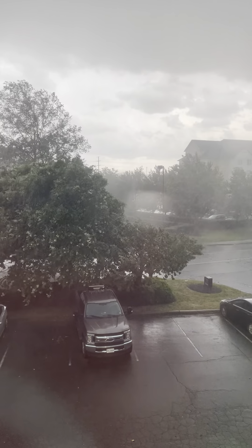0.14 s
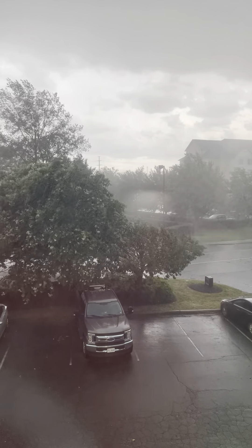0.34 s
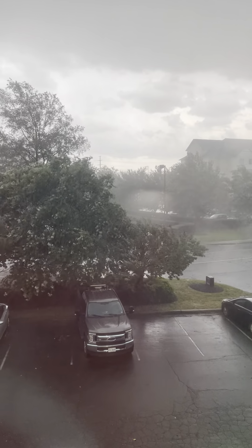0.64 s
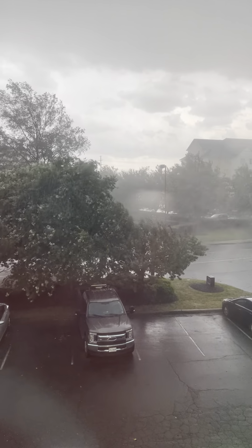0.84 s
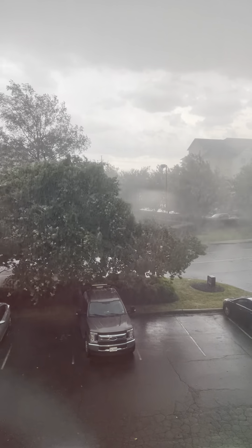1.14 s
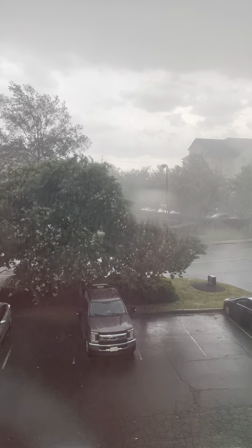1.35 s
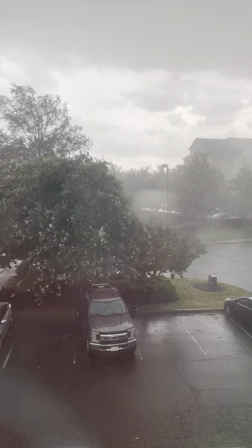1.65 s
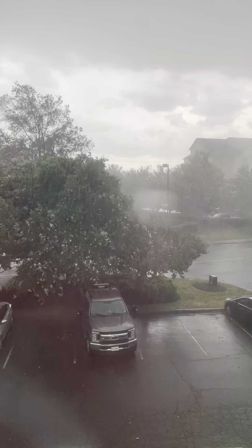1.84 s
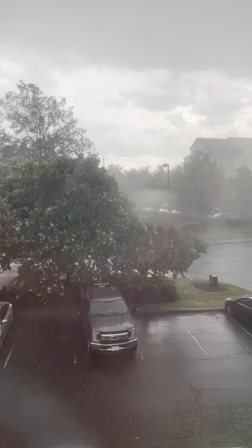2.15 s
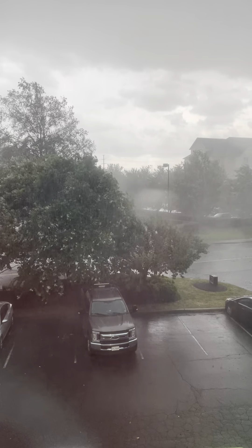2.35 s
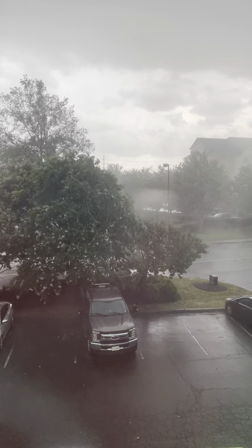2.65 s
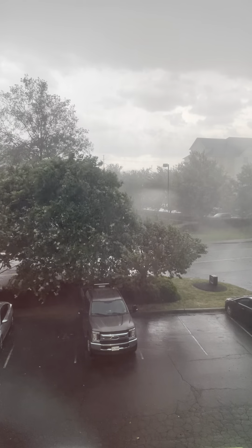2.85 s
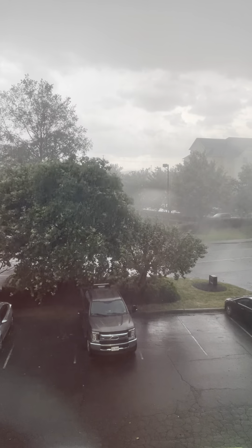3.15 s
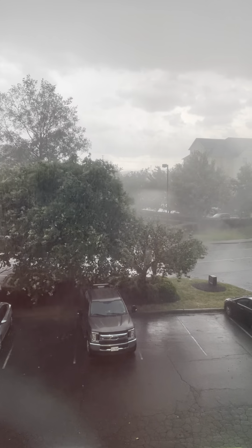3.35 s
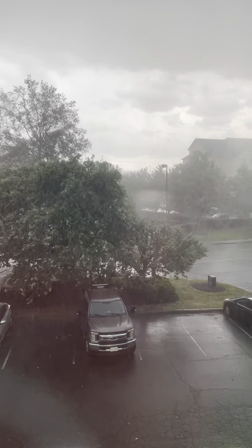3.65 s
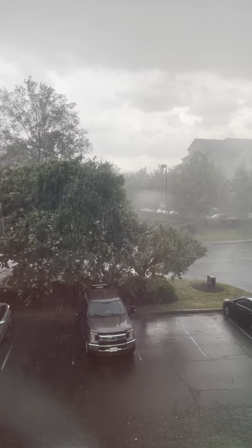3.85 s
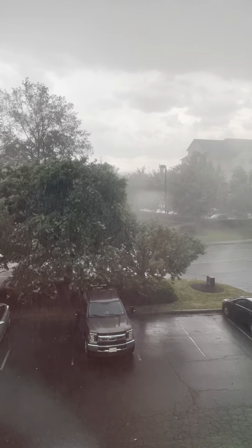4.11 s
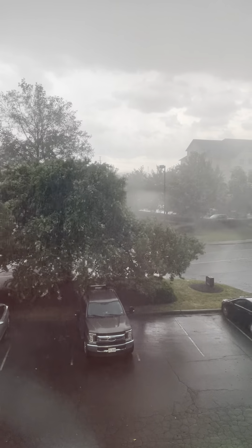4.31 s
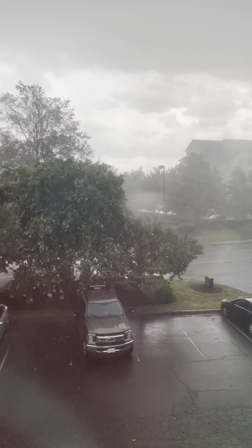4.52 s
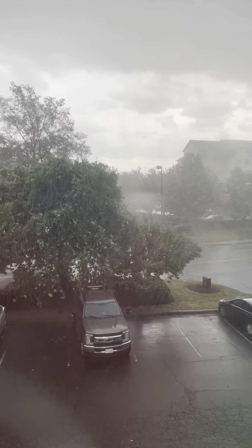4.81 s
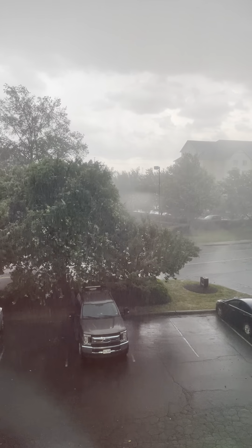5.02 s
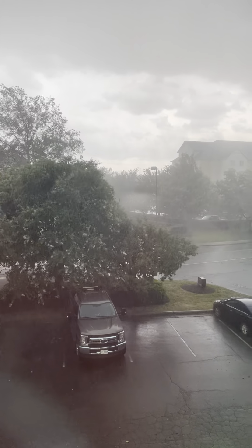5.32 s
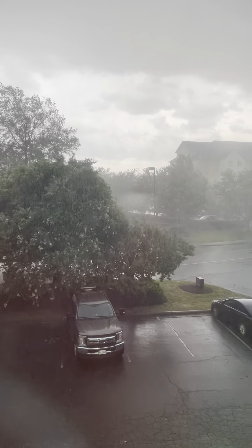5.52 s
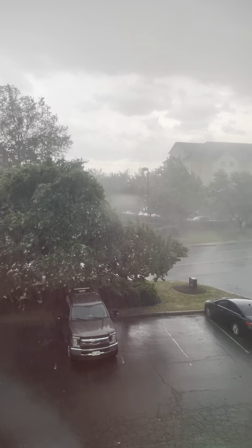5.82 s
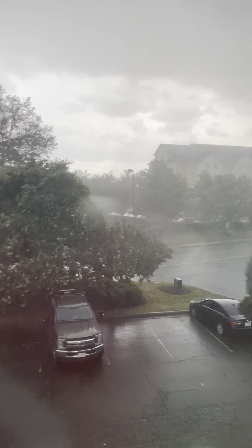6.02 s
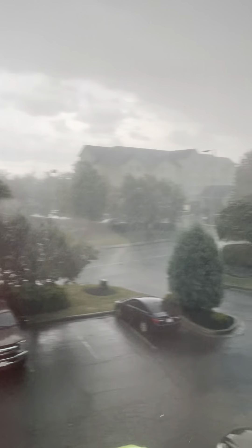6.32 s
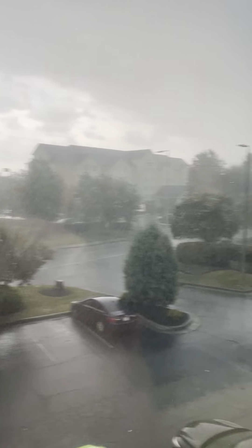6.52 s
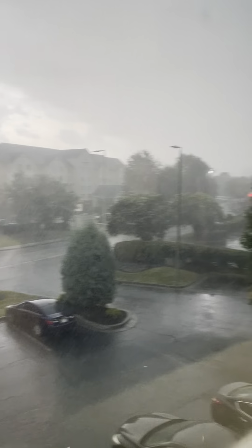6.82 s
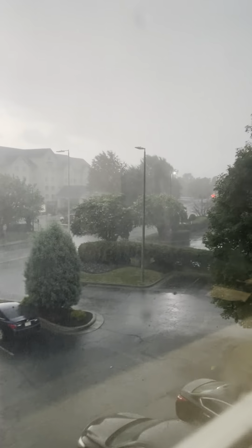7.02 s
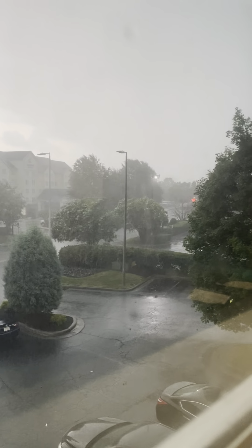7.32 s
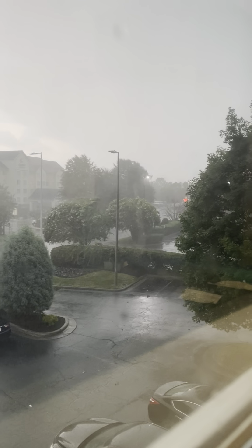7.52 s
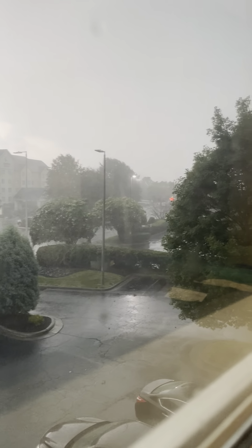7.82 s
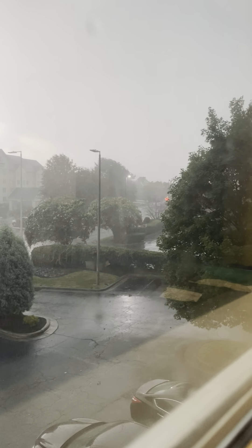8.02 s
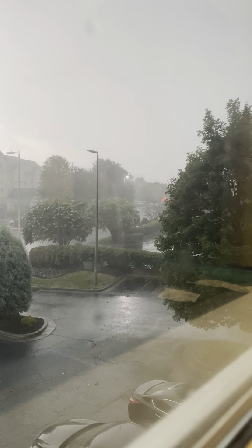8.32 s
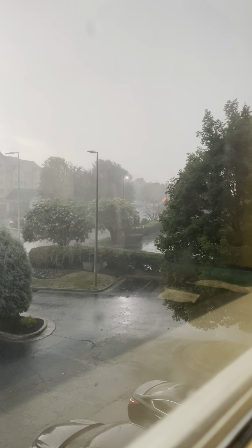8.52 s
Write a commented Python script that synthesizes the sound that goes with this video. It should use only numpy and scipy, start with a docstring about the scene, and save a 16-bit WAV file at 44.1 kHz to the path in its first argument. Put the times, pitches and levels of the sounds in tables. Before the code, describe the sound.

Heard indoors at a closed window, a heavy rainstorm is a dark, dense wash around 500 to 1500 hertz, with a much softer pattering hiss above and a low wind rush below. No thunder stands out. An air conditioner runs throughout: a deep, slightly throbbing compressor hum near 58 and 175 hertz, with faint higher lines and blower boom. At 0 to 1 second the gust is a little stronger, with soft finger rubbing and a sharp click at 0.27. From about 1.5 to 5.8 the sound is steady and nearly unhandled. From 6.0 to 7.5 the handheld microphone turns: dry scrapes at 6.1 and 6.3, rough ticks near 6.2, 6.8, 7.1 and 7.4, while the rain swells unevenly, hollow and phasey, with wide opposing channels. It settles into a steady wash and hum until 8.7.

```python
"""Rainstorm behind a closed window

Rain is coloured noise with random impacts, combed by early echoes: a muffled wash and a pattering hiss.
Wind is a low noise rush; an air conditioner adds fan boom (noise in room modes) and compressor hum (cosines).
A hand-held phone ticks and rubs in the grip (bursts through case modes) and turns at about six seconds;
on the way it crosses standing waves before the glass, where its two microphones hear opposite pressures."""
import sys
import numpy as np
from scipy import signal
from scipy.fft import rfft, irfft, next_fast_len
from scipy.io import wavfile

SR = 44100
rng = np.random.default_rng(int(sys.argv[2]) if len(sys.argv) > 2 else 0)


def waveform_to_disk(signal):
    """Save audio, clipped to [-1, 1], as 16-bit WAV at the path in sys.argv[1]."""
    frames = np.transpose(np.atleast_2d(signal))
    scaled = np.clip(frames, -1, 1) * 32767
    samples = np.round(scaled).astype(np.int16)
    wavfile.write(sys.argv[1], SR, samples)


N = 381906
T = np.arange(N) / SR
SIZE = next_fast_len(N, True)
FREQ = np.maximum(np.fft.rfftfreq(SIZE, 1 / SR), 1)

# moving air: (time [s], gust [dB], room boom [dB])
GUSTS = [(.2, 3.5, -1.5), (.8, 3.5, 2), (1.5, -0.5, -1.5), (4.1, 0.5, -5), (5.7, 0.5, -3), (6.8, 0, -1.6),
         (8.66, -0.5, -0.5)]
# phone swinging along the pane: (time [s], wash gain [dB], low rush gain [dB])
SWING = [(5.6, 0.5, 0), (6.02, 0.5, -0.5), (6.11, -0.5, 1.5), (6.19, 0.5, 4), (6.25, 2, 5), (6.325, -1, 1),
         (6.39, 4, 2.5), (6.55, 2.5, 1.5), (6.64, 1, -3), (6.77, 3.5, 1), (6.83, -1, 1.5), (6.9, 2, -1),
         (7.02, 0, -1), (7.08, -1, -0.5), (7.3, 1, 2), (7.55, 1, 1), (7.8, 0.5, 1)]


def undb(db):
    """Decibels to amplitude gain."""
    return np.exp(np.asarray(db) * (np.log(10) / 20))


def curves(table):
    """Columns of a table, joined by straight lines in time."""
    time_s, *columns = np.transpose(table)
    return [np.interp(T, time_s, column) for column in columns]


def colour(points):
    """Gain at each frequency for (Hz, dB) points, closed beyond the ends."""
    hz, db = np.transpose(points)
    return undb(np.interp(np.log(FREQ), np.log(hz), db, left=-200, right=-200))


def resonance(hz, width_hz, freq=FREQ):
    """Response of one damped mode."""
    return 1 / (1 + 1j * (freq / hz - hz / freq) * hz / width_hz)


def shape(x, response):
    """Filter by a frequency response."""
    return irfft(rfft(x, SIZE) * response, SIZE)[..., :N]


def unit(x):
    """Scale to rms 1."""
    return x / np.sqrt(np.mean(x ** 2))


def noise():
    """Two unrelated white noises."""
    return rng.standard_normal((2, N))


def walk(rate_hz):
    """Smooth random curve with spread near 1, a new knot rate_hz times a second."""
    knots, coarse_s = rng.standard_normal(1024), T[::64]
    step, part = np.divmod(coarse_s * rate_hz, 1)
    k = step.astype(int) % (len(knots) - 1)
    rise = np.sin(np.pi / 2 * part) ** 2
    return np.interp(T, coarse_s, knots[k] + (knots[k + 1] - knots[k]) * rise)


def ears(pair, likeness, pan_db):
    """Mix two unrelated sounds to left and right with given correlation and left-minus-right balance."""
    c = np.clip(likeness, -1, 1)
    mid = pair[0] * np.sqrt((1 + c) / 2)
    side = pair[1] * np.sqrt((1 - c) / 2)
    lean = undb(pan_db)
    return np.array([lean * (mid + side), mid - side]) * np.sqrt(2 / (1 + lean ** 2))


def drops(per_s, spread_db):
    """Random impacts of very unequal size, independent in two channels."""
    hit = rng.random((2, N)) < per_s / SR
    size = undb(spread_db * np.minimum(rng.exponential(size=(2, N)), 5))
    return unit(hit * size * rng.standard_normal((2, N)))


def sheets(x, points, flicker_db, rate_hz, count=5):
    """Colour a white sound and let overlapping bands swell independently."""
    edges = np.log([points[0][0], points[-1][0]])
    place = np.interp(np.log(FREQ), edges, [0, count - 1])
    spectrum = rfft(x, SIZE) * colour(points) * np.sqrt(SR / 2)  # unit white noise becomes 0 dB per Hz
    out = 0
    for k in range(count):
        band = irfft(spectrum * np.maximum(1 - abs(place - k), 0), SIZE)[..., :N]
        out = out + band * undb(flicker_db * walk(rate_hz))
    return out


def pose():
    """How far the phone has turned, and how far its microphones straddle a node, both 0-1."""
    # turn along the window: (time [s], share [0-1])
    turning = [(5.7, 0.02), (6.2, 0.4), (6.8, 1), (7.5, 1)]
    # straddling a node of the sound before the glass: (time [s], share [0-1])
    straddling = [(.3, 0.08), (5.4, 0.21), (5.9, 0.5), (6.2, 1), (6.4, 0.94), (6.6, .74), (6.78, .9),
                  (7.0, .48), (7.3, 1), (7.65, .5), (8, .27), (8.66, .33)]
    return np.clip(curves(turning)[0], 0, 1), np.clip(curves(straddling)[0], 0, 1)


def alike():
    """Left-right correlation of the storm: negative astride a node, where pressures oppose."""
    open_likeness, node_likeness = 0.36, -0.87
    return open_likeness + (node_likeness - open_likeness) * pose()[1]


def rain():
    """Countless far drops merge into a wash; nearer ones patter in the hiss that leaks round the pane."""
    # wash spectrum before gain: (frequency [Hz], facing ahead [dB per Hz], turned [dB per Hz])
    wash_spectrum = [(403, -90.5, -99.5), (555, -75.5, -69.5), (715, -79.5, -78.5), (870, -78.5, -77.5),
                     (1110, -82.5, -80), (1230, -83.5, -85.5), (1586, -85, -87), (1678, -93, -90),
                     (1960, -115, -102)]
    # hiss spectrum before gain: (frequency [Hz], facing ahead [dB per Hz], turned [dB per Hz])
    hiss_spectrum = [(1360, -110, -110), (1800, -95.5, -102), (1870, -93, -92.5), (2350, -91.5, -99),
                     (2600, -96.5, -102), (3060, -93.5, -103.5), (3350, -97, -105.5), (4100, -94, -100.5),
                     (4580, -102, -104), (5550, -105, -108), (6500, -114, -117), (7040, -124, -126),
                     (11200, -130, -130), (15100, -139, -139)]
    turn, straddle = pose()
    likeness = alike()
    gust_db = curves(GUSTS)[0]
    wash_db = -0.5 - 4.5 * turn + 6 * straddle + 0.38 * gust_db + curves(SWING)[0]
    pan_db = 7 - 3 * turn - 5.5 * straddle
    hiss_db = -0.86 + 2.5 * straddle ** 4 + 0.51 * gust_db
    far = sill(unit(noise() + undb(-4.5) * drops(per_s=1500, spread_db=3.5)), echo_db=-10)
    near = sill(unit(noise() + undb(-7.5) * drops(per_s=2000, spread_db=2.5)), echo_db=-14.5)
    wash = window(far, wash_spectrum, flicker_db=1.0, rate_hz=8.6)
    wash = ears(wash, likeness, pan_db) * undb(wash_db)
    hiss = window(near, hiss_spectrum, flicker_db=1.27, rate_hz=8) * undb(hiss_db)
    # the shortest waves are the least alike at the two microphones
    body = shape(hiss, 1 / (1 + (FREQ / 4400) ** 8))
    body_pair = ears(body, 0.75 * likeness + 0.25, pan_db=0.0)
    top_pair = ears(hiss - body, 0.58 * likeness - 0.3, pan_db=1.0)
    return wash + body_pair + top_pair


def window(x, table, flicker_db, rate_hz):
    """Sound through the pane crossfades between two colours as the phone turns."""
    hz, ahead_db, turned_db = np.transpose(table)
    turn = pose()[0]
    ahead = sheets(x, np.column_stack([hz, ahead_db]), flicker_db, rate_hz)
    turned = sheets(x, np.column_stack([hz, turned_db]), flicker_db, rate_hz)
    return (1 - turn) * ahead + turn * turned


def sill(x, echo_db, count=4):
    """Early echoes from glass, sill and frame comb the rain; delays slide as the phone sways and turns."""
    sample = np.arange(N)
    turn, straddle = pose()
    travel = turn + 0.13 * walk(1.8)
    echo = undb(echo_db + 7.5 * straddle)  # direct sound cancels at a node, so echoes stand out
    out = x.copy()
    for side in range(len(x)):
        for near, heading in rng.random((count, 2)):
            lag_s = 0.003 + 0.007 * near + 0.0018 * np.cos(2 * np.pi * heading) * travel
            delayed = np.interp(sample - lag_s * SR, sample, x[side])
            out[side] += echo / np.sqrt(count) * delayed
    return unit(out / np.sqrt(1 + echo ** 2))


def wind():
    """Only the lows of moving air pass the wall; the longest waves reach both microphones most alike."""
    # rush spectrum before gain: (frequency [Hz], level [dB per Hz])
    rush_spectrum = [(20, -34.5), (33, -26.5), (41, -23.5), (49, -12.5), (70, -8), (185, -14.5), (220, -18),
                     (340, -23.5), (385, -27.5), (460, -27.5), (520, -35), (700, -47.5)]
    gust_db, boom_db = curves(GUSTS)
    turn, straddle = pose()
    air = sheets(noise(), rush_spectrum, flicker_db=0.7, rate_hz=4.0)
    deep = shape(air, 1 / (1 + (FREQ / 270) ** 4))
    low = ears(deep, 1.05 + 0.16 * alike(), pan_db=3.5 - 2.2 * turn) * undb(-46.0 + boom_db)
    rush_db = -44 + gust_db - 2.5 * turn + 1.5 * straddle ** 3 + curves(SWING)[1]
    rush = ears(air - deep, 0.84 - 1.6 * straddle ** 6, pan_db=5.0 - 8.4 * turn)
    return low + rush * undb(rush_db)


def hollow(x, table, low_hz, high_hz, count=6):
    """Echo from the glass cancels or lifts a narrow band, which slides as the phone moves."""
    width_octaves = 0.18
    centre_hz, depth_db = curves(table)
    octaves, step = np.linspace(np.log2(low_hz), np.log2(high_hz), count, retstep=True)
    spectrum, out = rfft(x, SIZE), x
    for octave in octaves:
        weight = np.maximum(1 - abs(np.log2(FREQ) - octave) / step, 0)
        band = irfft(spectrum * weight, SIZE)[..., :N]
        nearness = np.exp(-0.5 * ((np.log2(centre_hz) - octave) / width_octaves) ** 2)
        out = out + band * (undb(depth_db * nearness) - 1)
    return out


def compressor():
    """An induction motor slips behind the mains, so its third multiple throbs against the magnetic pull."""
    # shaft lines: (multiple of shaft rate, rounded in use, mean level [dB], left lean before scaling [dB])
    hum = [(2.01, -44.5, -2), (4, -53, 2.5), (8, -65.5, 7), (9, -62, 15), (11, -74.5, 7), (12, -70.5, 12.5),
           (14, -72.5, -2), (15, -72.5, 6), (16, -67.5, 9), (18, -74.5, 2.5), (19, -66.5, 10),
           (20, -77, 15.5), (24, -79.5, 14.5), (25, -78.5, 9.5), (33, -76.5, 2.5), (42, -83.5, 0.5)]
    # motor iron lines: (multiple of mains, level [dB], left lean before scaling [dB])
    buzz = [(4, -53.5, 5), (6, -61.5, 3.5)]
    # casing's tenth multiple, fading as the phone moves: (time [s], level [dB])
    whine = [(0.1, -51), (0.45, -52.5), (0.75, -54), (1.3, -63.5), (1.55, -55), (5.8, -53.5), (6.25, -51),
             (7.0, -69.5), (7.38, -51.5), (7.62, -54.5), (7.77, -59.5), (8.1, -57), (8.6, -57)]
    # standing waves at the phone: (time [s], shaft note level [dB], third multiple level [dB])
    nodes = [(.3, -35, -34.5), (.8, -39, -40.5), (1.2, -31.5, -34), (2, -33, -40), (3, -35, -39.5),
             (5.6, -34.5, -40), (6.8, -36, -37.5), (7.9, -37.5, -38), (8.4, -32.5, -36.5)]
    shaft_hz, mains_hz, throb_peak_s = 58.15, 59.978, 0.048
    note_db, throb_db = curves(nodes)
    whine_db, = curves(whine)
    turn, straddle = pose()
    # running counts of cycles
    shaft = shaft_hz * (T - throb_peak_s) + 0.001 * walk(3)
    mains = mains_hz * (T - throb_peak_s)
    # short waves waver most as the phone drifts; its body shades them once turned, and they swell at a node
    shadow_db = -2.5 * turn + 3.9 * straddle
    out = 0
    for k, db, pan_db in hum:
        turns = round(k) * shaft + rng.random()
        waver_db = min(k / 10, 1) * 2.2 * walk(1.8) + min(k / 20, 1) * 2.0 * walk(11)
        out = out + tone(turns, db + waver_db + k / 20 * shadow_db, pan_db, turn, straddle)
    for k, db, pan_db in buzz:
        out = out + tone(round(k) * mains + rng.random(), db, pan_db, turn, straddle)
    out = out + tone(shaft + rng.random(), note_db, 0.3, turn, straddle)
    # the pull, twice per mains cycle, is carried round by the shaft
    third, pull = 3 * shaft, 2 * mains + shaft
    out = out + tone(third, throb_db, 3.5, turn, straddle)
    out = out + tone(pull, throb_db - 1.0, 2.5, turn, straddle)
    # the casing's node is narrow
    return out + tone(10 * shaft, whine_db, 13.0, turn, 0.65 * straddle ** 4)


def tone(turns, db, pan_db, turn, straddle, lead_cycles=0.029):
    """One hum line from its count of cycles; astride a node the microphones drift up to half a cycle apart."""
    opposed_hz = 486  # from here up, waves are short enough to oppose fully
    hz = (turns[-1] - turns[0]) / T[-1]
    opposition = np.sin(np.pi / 2 * straddle) ** 2 * min(hz / opposed_hz, 1) ** 3
    lead_cycles = lead_cycles + 0.5 * opposition
    lean = undb(pan_db * (0.5 - 0.48 * turn - 0.34 * straddle))
    left = lean * np.cos(2 * np.pi * (turns + lead_cycles))
    right = np.cos(2 * np.pi * turns)
    return np.array([left, right]) * 2 * undb(db) / np.sqrt(1 + lean ** 2)


def ticks(size=8192):
    """Each slip of the hand is a snap and a short rough scrape into the case modes; the recess echoes it."""
    # ticks and creaks: (time [s], strength [dB], brightness [dB per octave], scrape sigma [s],
    # snap over scrape [dB], ring of the spot touched [Hz], ring strength [dB],
    # recess echo before its lowpass [dB], left-right likeness [-1..1], left minus right [dB])
    slips = [(.270, -23.5, -2.5, 0.00071, 4.5, 3450, 10, -8, .6, 10),
             (.271, -22.5, -10, .0014, 2, 1140, -4, 7.5, 0.55, 8),
             (6.025, -29.5, -2, .0012, 2.5, 2750, 26, -9, -0.35, 2),
             (6.167, -24, -3, 0.0013, -5, 5300, 1, -10, -0.25, 2),
             (6.216, -46, 9, .003, -12, 11500, 12, -10, .6, 1),
             (6.294, -34, 1, .003, -10, 3500, 3, -8, -.3, 0),
             (6.755, -32.5, 1, 0.0048, -11, 4600, 14, -5, -.4, 0),
             (6.783, -19.5, -0.5, 0.011, -18, 3070, 1, -13, -0.45, 1),
             (7.092, -48, 5, .0015, -11, 7000, 1, -5, 0, -1),
             (7.137, -22, -8, 0.0021, 1, 2650, 3, 2, -0.14, 3),
             (7.316, -38.5, 3.5, 0.0016, -2.5, 5000, -1, -2, 0, 0),
             (7.369, -39, -2, .002, -6, 2100, 4, -4, 0, 0),
             (7.428, -24, 2, 0.0067, -17, 11000, 3, -1, 0, 0),
             (7.46, -36, 1, .004, -10, 4000, 6, -2, -0.046, -1),
             (7.49, -48, 9, .001, -4, 9600, 3, -2, 0, -4)]
    # modes of phone and case: (frequency [Hz], width before squaring [Hz], level [dB])
    modes = [(1050, 850, -7.5), (1600, 790, -2), (2090, 360, -2), (3370, 1800, -7), (6040, 1900, -17.5),
             (8000, 2000, -30.5), (10230, 5100, -27)]
    recess_t60_s, recess_hz = 0.075, 1820
    out = np.zeros((2, N + size))
    t, middle = np.arange(size) / SR, size // 2
    freq = np.maximum(np.fft.rfftfreq(size, 1 / SR), 1)
    case = 0
    for k, (hz, width_hz, db) in enumerate(modes):
        case = case + undb(db) * resonance(hz, width_hz, freq) ** 2 * (-1) ** k
    for s, db, bright_db, sigma_s, snap_db, spot_hz, spot_db, echo_db, likeness, pan_db in slips:
        scrape, tail = rng.standard_normal((2, 2, size))
        knots_s = t[::48]
        catches = undb(5.5 * np.interp(t, knots_s, rng.standard_normal(len(knots_s))))
        burst = np.exp(-0.5 * ((t - t[middle]) / sigma_s) ** 2)
        force = unit(scrape * catches * burst) / np.sqrt(size)
        force[0, middle] += undb(snap_db)
        # a harder contact favours the upper modes
        ring = case * undb(bright_db * np.log2(np.clip(freq, 500, 7000) / 1000))
        ring = ring * (1 + undb(spot_db) * resonance(spot_hz, 0.15 * spot_hz, freq))
        ring = ring / np.sqrt(np.mean(abs(ring) ** 2))
        tail = unit(tail * np.exp(-np.log(1000) * t / recess_t60_s)) / np.sqrt(size)
        recess = 1 + undb(echo_db) * rfft(tail) / (1 + (freq / recess_hz) ** 4)
        sound = irfft(rfft(force) * ring * recess)
        start = int(s * SR) - middle
        out[:, start:start + size] += undb(db) * ears(sound, likeness, pan_db)
    return out[:, :N]


def rubs():
    """Fingers catch and slip on the case: skin hisses and the case passes on a dry scrape."""
    # strokes: (time [s], swell sigma [s], skin hiss level [dB], dry scrape level [dB])
    strokes = [(0.133, 0.021, -76.5, -73), (0.225, .22, -77, -71), (0.583, 0.06, -66, -69),
               (.83, .03, -85, -80), (1.001, 0.47, -84, -79), (1.72, 0.028, -80, -76),
               (5.86, 0.019, -78.5, -76), (6.105, 0.065, -81.5, -59.5), (6.283, 0.075, -74.5, -61.5),
               (6.487, 0.048, -84, -70), (6.679, 0.22, -86, -78), (6.86, 0.014, -82, -78),
               (6.912, 0.024, -73.5, -70), (7.17, 0.087, -86, -80.5), (7.437, .08, -76.5, -76)]
    # skin on case, relative colour: (frequency [Hz], level [dB per Hz])
    skin_colour = [(1500, -8.5), (3500, 1), (6000, 4), (7800, -23), (9500, 0), (12000, -5.5), (14000, -28)]
    # dry scrape, relative colour: (frequency [Hz], level [dB per Hz])
    scrape_colour = [(1400, -9), (2050, 3), (2700, 0.5), (4200, -10), (6000, -20.5), (7500, -30.5),
                     (9000, -38.5)]
    catches_per_s, catch_spread_db, catch_s, smooth_share = 350, 1.8, 0.003, 0.55
    skin = scrape = 0
    for s, sigma_s, skin_db, scrape_db in strokes:
        swell = np.exp(-0.5 * ((T - s) / sigma_s) ** 2)
        skin = skin + swell * undb(skin_db)
        scrape = scrape + swell * undb(scrape_db)
    impacts = drops(catches_per_s, catch_spread_db)[0] ** 2 + 1e-18
    catches = signal.lfilter([1], [1, -np.exp(-2 / (catch_s * SR))], impacts)
    grain = np.sqrt(smooth_share + (1 - smooth_share) * catches / np.mean(catches))
    grain = grain * undb(2.4 * walk(41))
    skin_noise = unit(shape(noise() * grain, colour(skin_colour)))
    scrape_noise = unit(shape(noise() * grain, colour(scrape_colour)))
    skin_pair = ears(skin * skin_noise, likeness=0.79, pan_db=-0.5)
    return skin_pair + ears(scrape * scrape_noise, likeness=-0.24, pan_db=-0.5)


def fan():
    """Turbulent air from the blower rings the low modes of the room."""
    # room modes: (frequency [Hz], width before broadening [Hz], level before boom gain [dB])
    modes = [(65.06, 2.5, -43), (87.5, 3.6, -48.5), (108.6, 7.3, -47), (134.9, 11, -44.5),
             (151.8, 8.7, -49), (199.3, 5.5, -43.5)]
    power = 0
    for hz, width_hz, db in modes:
        mode = unit(abs(resonance(hz, 1.72 * width_hz)) ** 2)
        power = power + (undb(db) * mode) ** 2
    boom = shape(noise(), np.sqrt(power))
    return ears(boom, 1.1 + 0.092 * alike(), pan_db=1.0) * undb(curves(GUSTS)[1])


def scene():
    """Storm outside; air conditioner and hand inside."""
    # gliding band of the storm's colour: (time [s], centre [Hz], gain [dB])
    lower_band = [(.35, 970, -3), (.7, 785, -6.5), (1.05, 680, -9), (1.35, 474, -5.5), (1.8, 377, 0),
                  (5.9, 853, -1.5), (6.2, 724, -2), (6.5, 694, -7), (6.75, 650, 2), (6.95, 610, -10),
                  (7.2, 428, 0), (7.45, 420, 0), (7.8, 740, -3), (8.66, 760, -2.5)]
    # higher hollow that passes into a peak: (time [s], centre [Hz], gain [dB])
    upper_band = [(5.95, 1750, 0), (6.2, 1650, -1.5), (6.4, 1580, -4), (6.65, 1500, -3), (6.8, 1150, 2.5),
                  (7.0, 1200, 3.5), (7.4, 1150, 2.5), (7.8, 1300, 1)]
    storm = hollow(rain() + wind(), lower_band, low_hz=300, high_hz=1090)
    storm = hollow(storm, upper_band, low_hz=1050, high_hz=1900, count=5)
    return storm + fan() + compressor() + ticks() + rubs()


def record(dry):
    """The phone cuts the top with a steep elliptic lowpass at 15.7 kHz."""
    return signal.sosfilt(signal.ellip(8, 0.1, 80, 15700, fs=SR, output="sos"), dry)


dry = scene()
out = record(dry)
waveform_to_disk(out)
```